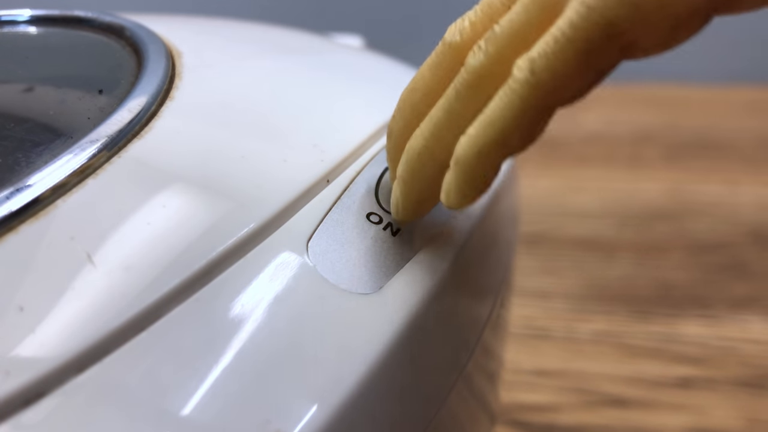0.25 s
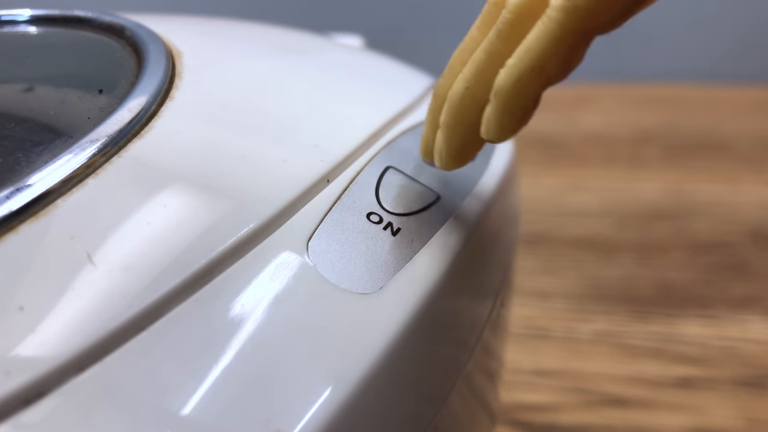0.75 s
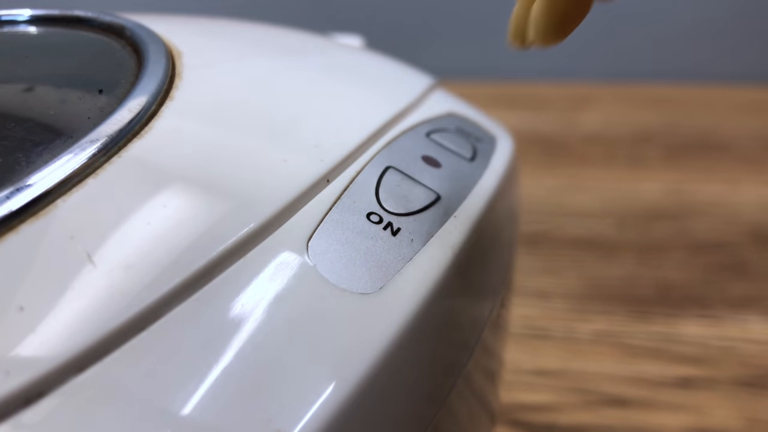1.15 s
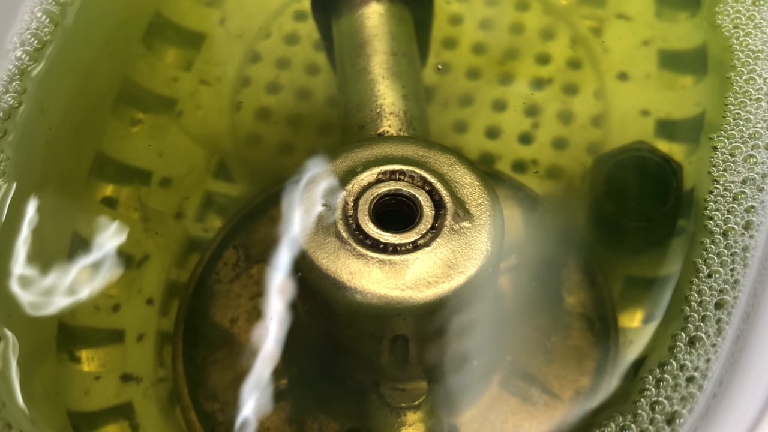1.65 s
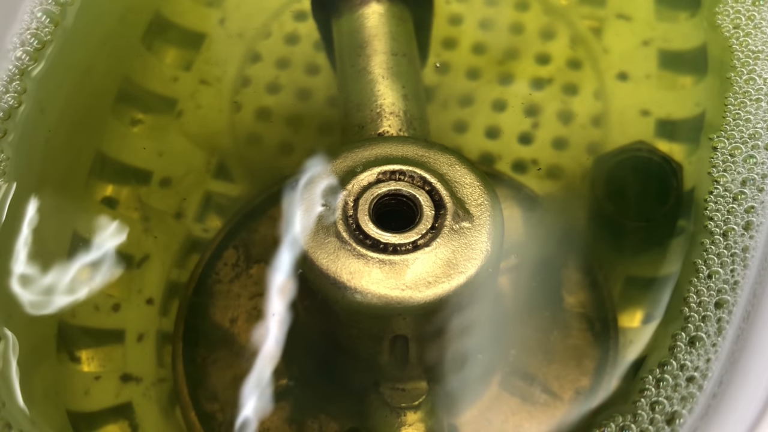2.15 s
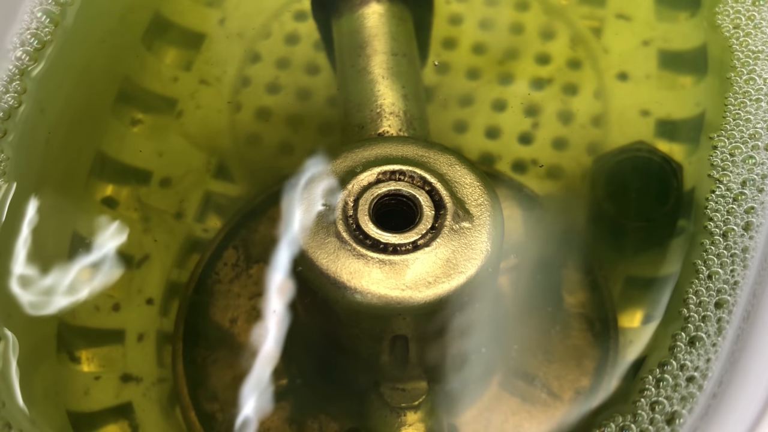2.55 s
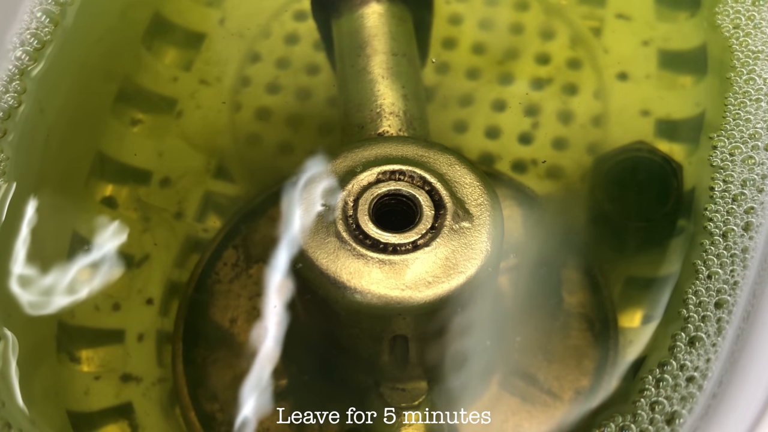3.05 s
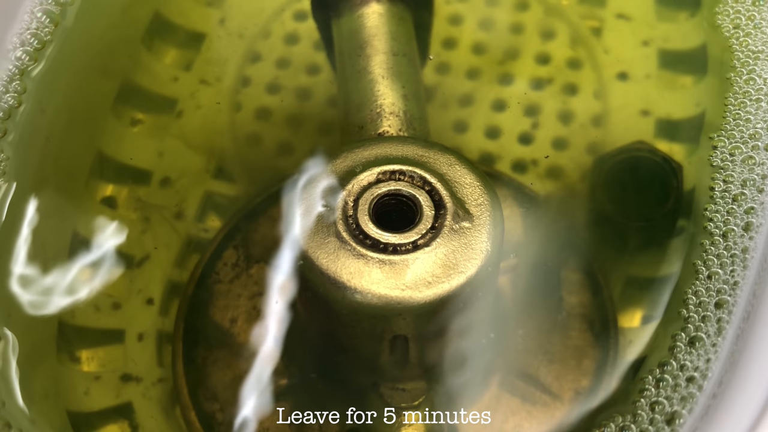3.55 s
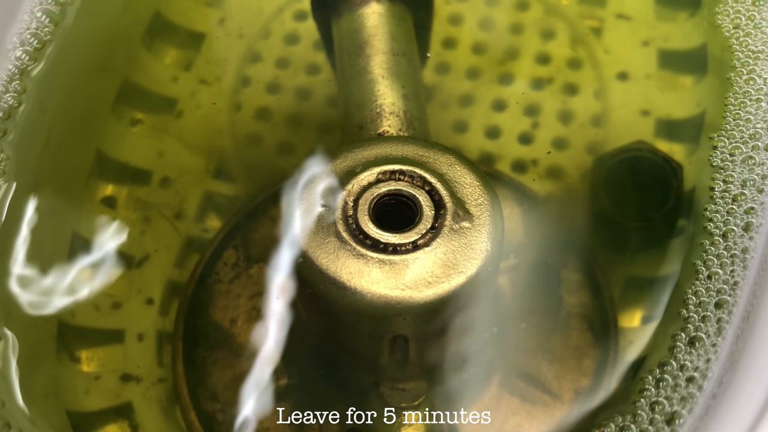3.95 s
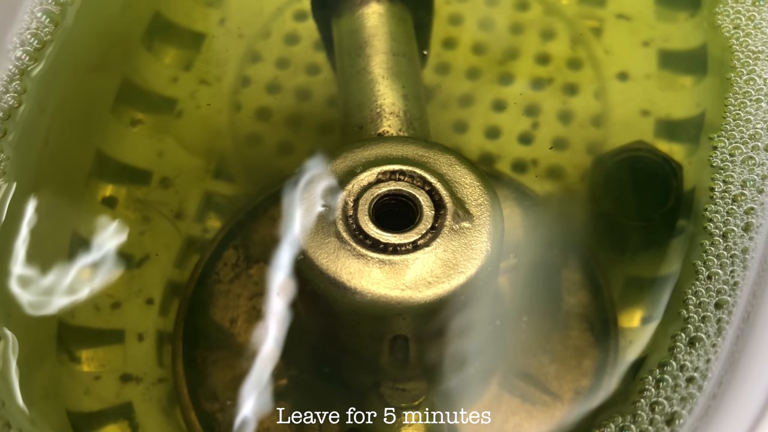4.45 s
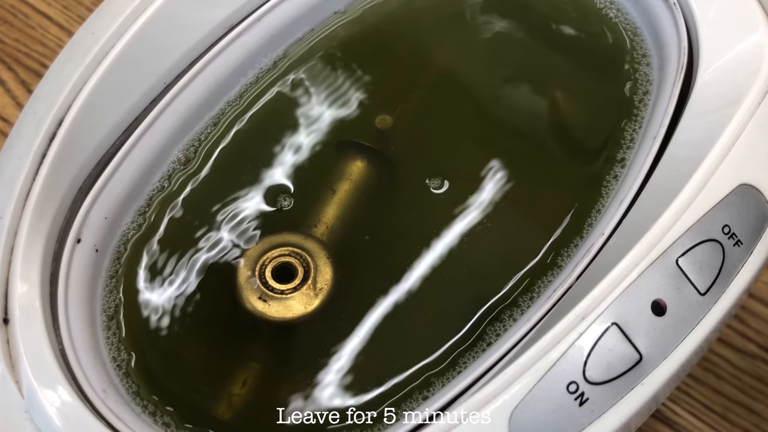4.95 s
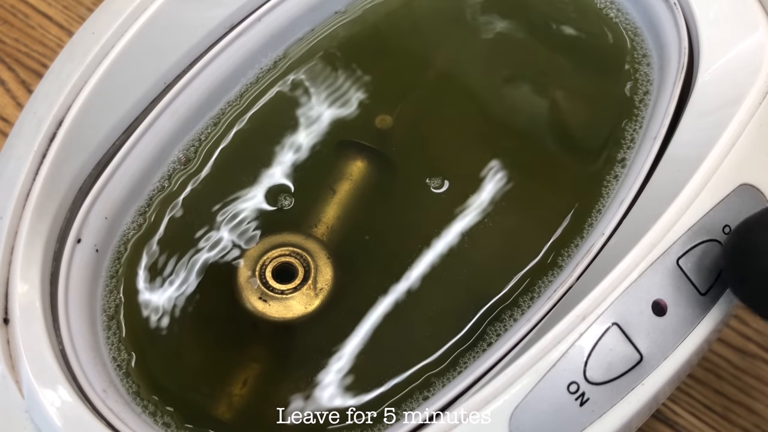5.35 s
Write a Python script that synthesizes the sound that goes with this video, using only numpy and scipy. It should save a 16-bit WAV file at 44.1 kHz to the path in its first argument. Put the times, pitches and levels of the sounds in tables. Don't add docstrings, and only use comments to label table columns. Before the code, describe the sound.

Soft bumps and a button click, then a small cleaning bath buzzes steadily, bright and sizzling up close, then a little more distant.

```python
import sys
import numpy as np
from scipy import signal
from scipy.fft import rfft, irfft, next_fast_len
from scipy.io import wavfile
from scipy.ndimage import uniform_filter1d, map_coordinates

SR = 44100
rng = np.random.default_rng(int(sys.argv[2]) if len(sys.argv) > 2 else 0)


def volts(x):
    e = np.asarray(x, float) / 20
    return 10 ** e


def materialize(psi):
    bounded = np.clip(np.atleast_2d(psi).T, -1, 1)
    quanta = np.round(bounded * 32767).astype(np.int16)
    wavfile.write(sys.argv[1], SR, quanta)


N = 246519
T = np.arange(N) / SR
LEAD = .004
SPAN = np.arange(2048) / SR

# start_s, end_s, first_burst_s, mains_hz
POSITIONS = [
    (0, 1.5036, .3685, 49.990),
    (1.5036, 4.7088, 1.5222, 49.988),
    (4.7088, 5.6, 4.7561, 50.026),
]
# snap_db, fizz_db, rattle_db, pings_db, casing_db, hum_db, floor_db
LAYER_LEVELS = [
    (-52, -56, -55.5, -64.5, -58.5, -54, -58.5),
    (-30, -27.5, -35, -33, -43.5, -49.5, -52),
    (-38.5, -33.5, -39.5, -42, -49, -53.5, -56.5),
]
# drive_on_s, fizz_t60_s, room_answer_db, snap_t60_s, lasting_habit_db,
# jolt_s, rattle_t60_s, first_rattle_db
BURST_SHAPES = [
    (.004, 0.057, 9, 0.014, -16, 0.0051, 0.076, 6.5),
    (.0078, 0.0089, -19, 0.0051, -32.5, 0.0049, 0.022, -2),
    (.008, .016, -7, 0.017, -16, 0.006, .028, 2),
]
# pitch_hz, level_db (per Hz)
FIZZ_COLOURS = [
    [(1760, -39), (3000, -9), (3330, -2), (4220, -9), (5240, -5), (6200, -14), (6740, 2.5), (8660, -2),
     (9360, -3), (10000, 1.5), (15900, -12)],
    [(880, -49), (1500, -51), (2540, -15), (2750, -13), (3010, -15), (3690, -9), (3960, -16.5),
     (4900, -5.5), (6370, -11.5), (7410, -5), (11800, -4.5), (15200, 4), (16800, -31)],
    [(880, -52), (1500, -31), (1710, -17), (2000, -35), (2320, -5), (3020, -19.5), (4450, -1), (5360, -6),
     (5750, -3.5), (8700, -5), (10700, -5.5), (13000, 5), (15900, -3)],
]
# pitch_hz, width_hz, level_db
TANK_RINGS = [
    [(8600, 180, -19), (10000, 200, -1), (12400, 110, 2)],
    [(7370, 450, 2), (8730, 460, 6), (10500, 140, -4), (11560, 97, 1.5), (12480, 240, 3), (13340, 620, 0),
     (15350, 400, 1.5), (15700, 200, 0)],
    [(11400, 83, -7), (12600, 150, -10), (13700, 120, -7), (14800, 250, 4)],
]
# pitch_hz, level_db (per Hz)
SNAP_COLOURS = [
    [(5500, -42), (7000, -19), (8900, 0), (9500, -7), (10200, 1.5), (11500, -14), (14000, -14),
     (16000, -25)],
    [(3500, -44), (5000, -4.5), (5750, 3), (6500, -10.5), (7300, -5), (8600, -2.5), (10200, 2.5),
     (11000, -1.5), (12100, -5), (13500, -2), (15200, 2), (16800, -25)],
    [(3000, -24), (4500, -9), (6000, -6), (9000, 4), (10600, -7), (12000, -4), (14000, 5), (15800, -1),
     (16100, -20)],
]
# pitch_hz, level_db (per Hz)
RATTLE_COLOURS = [
    [(1250, -21), (1400, 0), (2300, -4), (3300, -4.5), (4500, -7), (6000, -6), (9000, -6.5), (11500, -15)],
    [(1250, -22.5), (1600, -16.5), (2500, -12.5), (3300, -2), (4400, 2.5), (5600, -2.5), (6500, -0.5),
     (7600, 5.5), (9000, -15.5), (12000, -16), (15000, -16), (16000, -28)],
    [(1250, -11), (1800, -16), (2400, -12.5), (3500, -5), (4200, -1.5), (5300, -0.5), (6200, -0.5),
     (8500, -5), (10500, -12), (14000, -13), (15800, -16)],
]
# pitch_hz, delay_s, level_db, t60_s, rise_s
PING_MODES = [
    [(5100, .0058, -3, .02, .0006), (8900, .0062, -2, .02, .0006)],
    [(5000, .0012, -19, .014, .0008), (4815, .0025, 0, .019, .003), (5018, .0025, -1, .019, .003),
     (4670, .006, -22, .02, .001), (7600, .0066, -20, .012, .0006)],
    [(4540, .0066, 0, .02, .0008), (5750, .0066, -1, .014, .0005), (6200, .0068, -2, .014, .0005),
     (4300, .0012, -6, .02, .0008)],
]
# pitch_hz, level_db
CASING_MODES = [
    [(1385, 1), (1550, -7), (2000, -5), (2310, 6), (2650, -4), (2850, -6), (3250, -4), (3450, -6),
     (3600, -8)],
    [(1350, -14), (1550, -11), (1850, -15), (2350, -7), (2800, -4), (3200, -6), (3400, -8), (3745, 2),
     (4150, -4), (4290, -2), (5550, -2)],
    [(1350, -9), (1650, -15), (3350, -6), (3800, -6), (4000, -3), (4350, 0), (4750, -1), (5100, -1)],
]
# multiple, level_db
HUM_FAVOURED = [
    [(1, -7), (2, -10), (3, -11), (4, -13), (5, -6), (6, -11), (7, -5), (8, -2), (9, -14), (10, -7),
     (16, -12), (17, -9), (19, -14), (22, -13)],
    [(1, -14), (3, -5), (4, -5), (6, -15), (7, -16), (10, -6), (11, -4), (12, -6), (13, -7), (15, 0),
     (17, -3), (20, -4), (24, -16)],
    [(1, -18), (2, -15), (7, -4), (9, -5), (10, -1), (11, 0), (12, -5), (13, -3), (14, -5), (16, -2),
     (22, -14), (23, -2), (24, -15)],
]
# pitch_hz, level_db (per Hz)
FLOOR_COLOURS = [
    [(53, -37), (90, 0.5), (394, -1), (656, -10.5), (838, -5.5), (1230, -12.5), (2360, -15), (6000, -30),
     (7800, -49), (13200, -120)],
    [(53, -40), (90, -21), (205, -3.5), (342, -9), (744, -8), (1260, -12), (2750, -9), (3000, -8),
     (3900, -7), (6600, -120)],
    [(53, -42), (90, -7), (295, -7), (547, -3.5), (1240, -10), (1960, -14), (2340, -2.5), (3000, -17),
     (3900, -37), (6600, -120)],
]
# pitch_hz, level_db (per Hz)
DEEP_COLOURS = [
    [(8.8, -32), (15, -2), (54, 0), (76, -4), (130, -15), (170, -45), (290, -120)],
    [(8.8, -60), (15, -30), (54, 0), (102, -1), (119, -7), (130, -2), (170, -32), (290, -120)],
]
# start_s, peak_db
CONTACTS = [
    (.2726, -30),
    (.2830, -42),
    (.2888, -42),
    (.2975, -46),
]
# pitch_hz, level_db, t60_s
BUTTON_MODES = [(507, -7, 0.053), (770, -5, 0.059), (1330, 0, .02), (1647, 6, 0.031), (1900, 1, .035),
                (3730, 2.5, 0.018), (5600, -2, .01)]
# pitch_hz, level_db, t60_s
KNOCK_MODES = [(337, -36.5, 0.43), (394, -39, 0.13), (810, -53, 0.29)]
# lifts_off_s, rumble_db, table_pitch_hz, table_db, release_s
RESTING_HAND = (1.1, -55, 43, -57, 0.5)
# start_s, peak_db, pitch_hz
BUMPS = [
    (.19, -44, 60),
    (.755, -41, 60),
    (1.262, -42, 80),
]
# start_s, length_s, level_db
ENGINE_SWELLS = [
    (1.5, .22, -61),
    (1.95, .55, -59.5),
    (2.63, 0.35, -59),
]

# ordinary mains multiples (dB), heave of the casing after a burst starts (s), house rumble (dB)
HUM_REST_DB, HUM_PUSH_S, HOUSE_DB = [-20, -10.5, -10], [.006, .0105, .0095], [-61, -67, -76]


def unit(x):
    return x / np.sqrt(np.mean(x ** 2) + 1e-20)


def gain_along(spectrum, size):
    hz, db = np.transpose(spectrum)
    grid_hz = np.fft.rfftfreq(size, 1 / SR)
    return volts(np.interp(np.log(grid_hz + 1), np.log(hz + 1), db, left=-120, right=-120))


def coloured(spectrum):
    size = next_fast_len(N)
    white = rfft(rng.standard_normal(size))
    return unit(irfft(white * gain_along(spectrum, size), size)[:N])


def wobble(rate):
    return map_coordinates(rng.standard_normal(int(N * rate / SR) + 4), [T * rate])


def wavering(hz, drift_hz):
    size = volts(1.1 * wobble(8.9))
    phase = 2 * np.pi * np.cumsum(hz + drift_hz * wobble(8)) / SR
    return unit(size * np.sin(phase))


def held(start, length, edge):
    inside = np.minimum(T - start, start + length - T)
    return np.clip(inside / edge + .5, 0, 1)


def struck(t, t60, rise):
    t = np.maximum(t, 0)
    return (1 - np.exp(-t / rise)) ** 2 * volts(-60 * t / t60)


def habit(envelope, spectrum, count):
    z = rfft(rng.standard_normal((count, len(SPAN))) * envelope)
    power = uniform_filter1d(np.abs(z) ** 2, size=15, axis=1)
    broad = np.sqrt(np.abs(power) + 1e-12)
    return irfft(z / broad * gain_along(spectrum, len(SPAN)))


def repeated(waves, position, jitter_s, scatter_db, weak_db):
    start, end, first, mains = position
    cycles = np.arange(np.floor((start - first) * mains) - 2, (end - first) * mains)
    chance = rng.standard_normal((len(cycles), 2))
    pick = np.maximum(rng.integers(-1, len(waves), len(cycles)), 0)
    at = (first + cycles / mains - LEAD + jitter_s * chance[:, 0]) * SR + SR
    shift = np.exp(-2j * np.pi * np.fft.rfftfreq(len(SPAN)) * (at % 1)[:, None])
    size = volts(scatter_db * chance[:, 1] + weak_db * (pick > 1))
    bursts = irfft(rfft(waves)[pick] * shift) * size[:, None]
    out = np.zeros(N + 2 * SR)
    for place, burst in zip(at.astype(int), bursts):
        out[place:place + len(SPAN)] += burst
    return out[SR:SR + N]


def rumble():
    position = np.searchsorted([p[1] for p in POSITIONS], T)
    near, far = coloured(DEEP_COLOURS[0]), coloured(DEEP_COLOURS[1])
    house = volts(np.take(HOUSE_DB, position) + 3 * wobble(7)) * np.where(position == 0, near, far)

    off, hand_db, table_hz, table_db, release = RESTING_HAND
    skin = volts(hand_db) * coloured(DEEP_COLOURS[0])
    table = volts(table_db) * wavering(table_hz, 2.7)
    hand = held(-1, off + 1, release) * (skin + table)

    bumps = np.zeros(N)
    for s, db, hz in BUMPS:
        bumps += volts(db) * struck(T - s, t60=.14, rise=.004) * np.sin(2 * np.pi * hz * (T - s))

    swells = sum(volts(db) * held(s, length, edge=.06) for s, length, db in ENGINE_SWELLS)
    engine = swells * wavering(66, drift_hz=3.1)
    return house + hand + bumps + engine * (position > 0)


def hum(position, rest_db, favoured, push_s):
    order = np.arange(24) + 1
    turn = rng.uniform(-1.01, 1, len(order)) * np.minimum(np.pi, .2 * order)
    cycle = 2 * np.pi * position[3] * (T - position[2] - push_s)
    level = dict(favoured)
    out = np.zeros(N)
    for k, phase in zip(order, turn):
        out += volts(level.get(k, rest_db) + 1.15 * wobble(6)) * np.cos(k * cycle + phase)
    return out


def button():
    t = T[:SR]
    out = sum(volts(db - 60 * t / t60) * np.sin(2 * np.pi * hz * t) for hz, db, t60 in KNOCK_MODES)
    plastic = coloured([(400, -4), (800, 1.5), (2000, -5), (4000, -6.5), (7500, -6), (10000, -22)])[:SR]
    for s, peak_db in CONTACTS:
        ring = np.zeros(SR)
        for hz, db, t60 in BUTTON_MODES:
            ring += volts(db) * np.sin(2 * np.pi * hz * (t - s)) * struck(t - s, t60, rise=.00045)
        tick = 1.3 * struck(t - s, t60=.032, rise=.00014) * plastic
        out = out + volts(peak_db - 7.5) * (ring + tick)
    return np.pad(out, (0, N - SR))


def casing(position, burst, modes):
    t = SPAN - LEAD - burst[5]
    turn = rng.uniform(0, 2 * np.pi, len(modes))
    panels = sum(volts(db) * np.sin(2 * np.pi * hz * t + p) for (hz, db), p in zip(modes, turn))
    wave = panels * struck(t, t60=.04, rise=.00081)
    return repeated(wave[None], position, jitter_s=.000008, scatter_db=1, weak_db=0)


def rattle(position, burst, colour):
    jolt, t60, first_db = burst[5:]
    starting = volts(first_db) * struck(SPAN - LEAD, t60, rise=.00064)
    stopping = struck(SPAN - LEAD - jolt, t60, rise=.00094)
    waves = habit(starting + stopping, colour, count=1)
    return repeated(waves, position, jitter_s=.000008, scatter_db=-.2, weak_db=0)


def pings(position, modes):
    t = SPAN - LEAD
    wave = np.zeros(len(SPAN))
    for hz, s, db, t60, rise in modes:
        wave += volts(db) * struck(t - s, t60, rise) * np.sin(2 * np.pi * hz * (t - s))
    return repeated(wave[None], position, jitter_s=.000007, scatter_db=.9, weak_db=0)


def fizz(position, burst, colour, tank):
    on, t60, room_db = burst[:3]
    period = 1 / position[3]
    tau = (T - position[2]) % period
    direct = struck(tau, t60=.34, rise=.00022) * volts(-60 * np.maximum(tau - on, 0) / t60)
    echo = volts(room_db - 60 * ((tau - on) % period) / .037)
    bubbles = coloured(colour) * np.hypot(direct, echo)
    crackle = volts(.5 * wobble(40) + 1.8 * wobble(900))
    size = next_fast_len(N)
    f = np.fft.rfftfreq(size, 1 / SR)
    ring = 1
    for hz, width, db in tank:
        ring = ring + volts(db) * 1j * f * width / (hz * hz - f * f + 1j * f * width)
    return irfft(rfft(bubbles * crackle, size) * ring, size)[:N]


def snap(position, burst, colour):
    on, t60, _, snap_t60, lasting_db = burst[:5]
    t = SPAN - LEAD
    first = struck(t, snap_t60, rise=.00073)
    release = volts(-60 * np.maximum(t - on, 0) / t60)
    lasting = volts(lasting_db) * struck(t, t60=.32, rise=.0003) * release
    waves = habit(first + lasting, colour, count=3)
    return repeated(waves, position, jitter_s=.000009, scatter_db=.6, weak_db=-5)


def bath():
    out = np.zeros(N)
    for k, position in enumerate(POSITIONS):
        heard = (T >= position[0]) & (T < position[1])
        burst = BURST_SHAPES[k]
        layers = (
            snap(position, burst, SNAP_COLOURS[k]),
            fizz(position, burst, FIZZ_COLOURS[k], TANK_RINGS[k]),
            rattle(position, burst, RATTLE_COLOURS[k]),
            pings(position, PING_MODES[k]),
            casing(position, burst, CASING_MODES[k]),
            hum(position, HUM_REST_DB[k], HUM_FAVOURED[k], HUM_PUSH_S[k]),
            coloured(FLOOR_COLOURS[k]),
        )
        out[heard] = sum(volts(db) * unit(layer[heard]) for db, layer in zip(LAYER_LEVELS[k], layers))
    return out


def scene():
    return (bath() + button() + rumble())[None]


def band_limit(x):
    return signal.sosfilt(signal.butter(12, 16800, fs=SR, output="sos"), x)


def record(dry):
    return band_limit(dry)


dry = scene()
out = record(dry)
materialize(out)
```